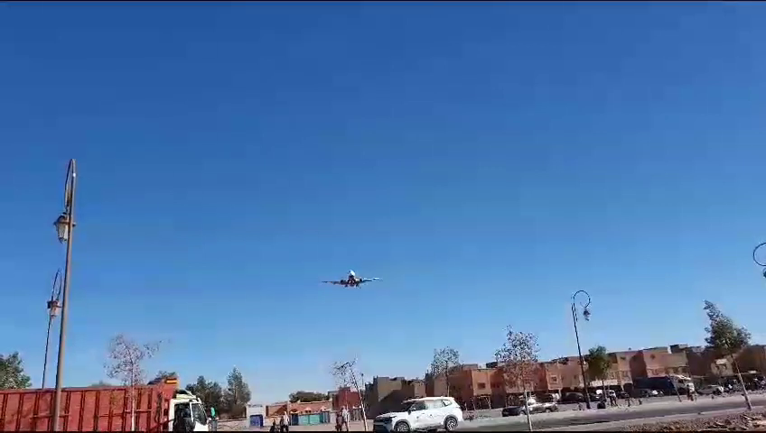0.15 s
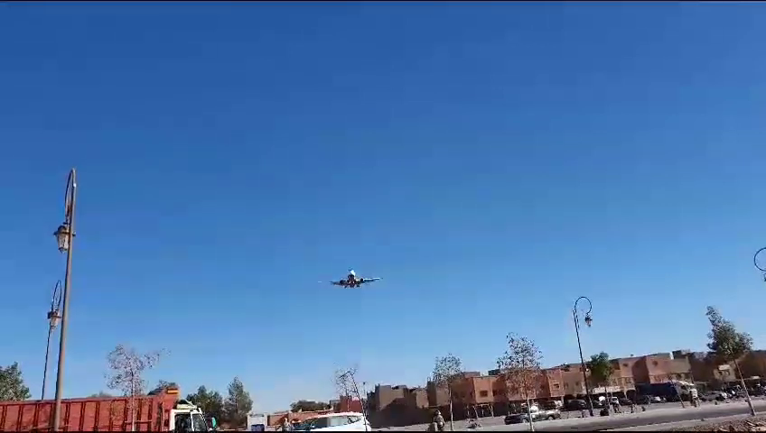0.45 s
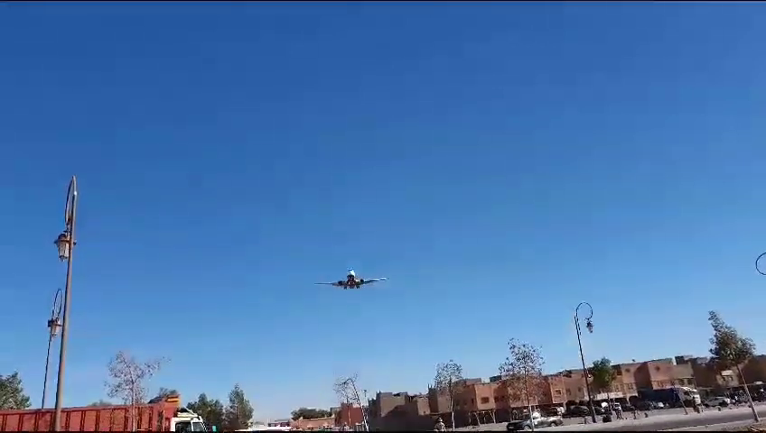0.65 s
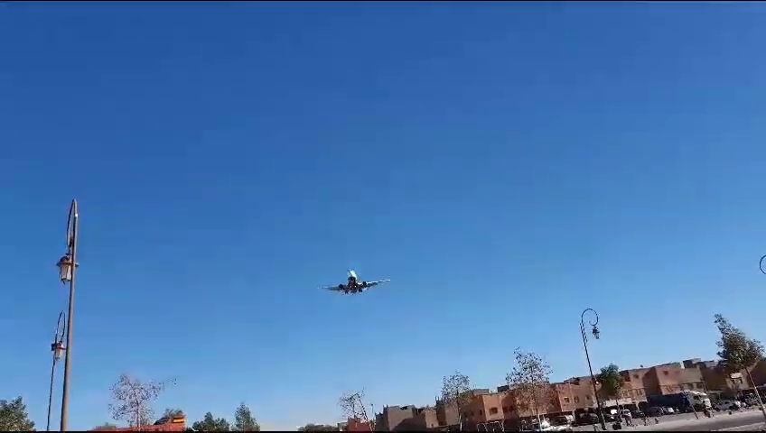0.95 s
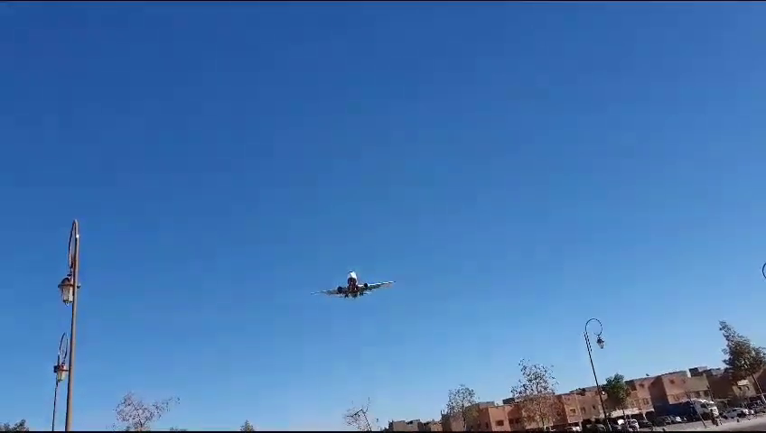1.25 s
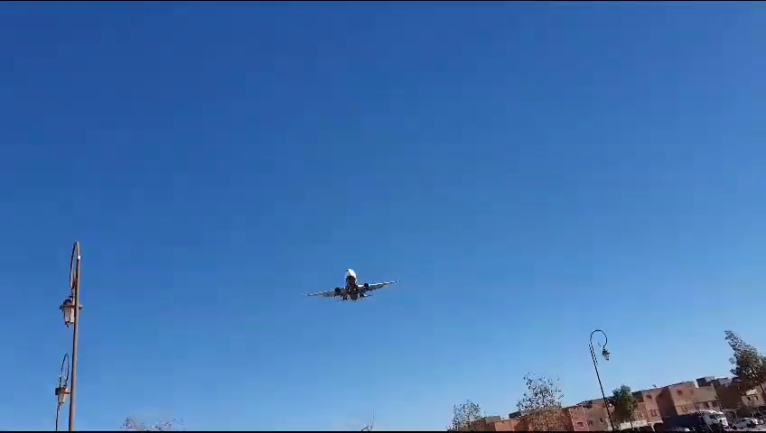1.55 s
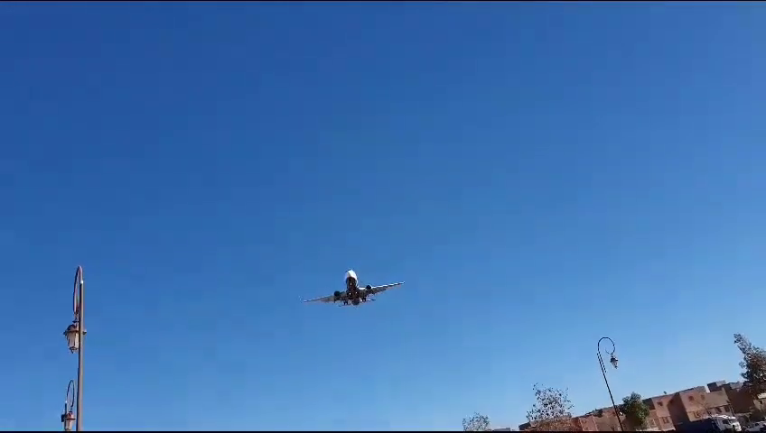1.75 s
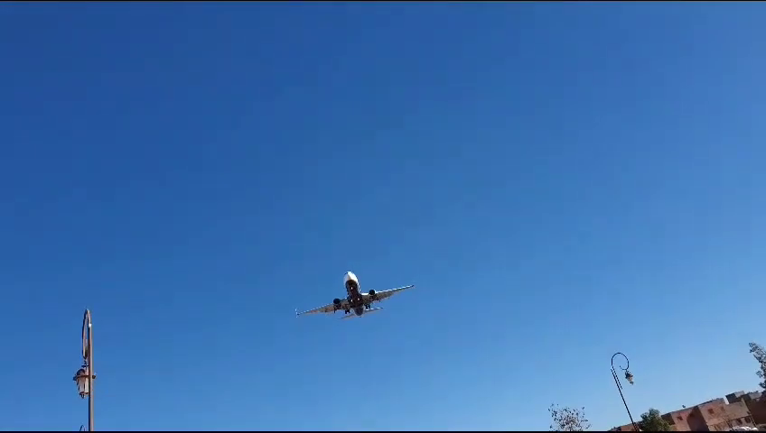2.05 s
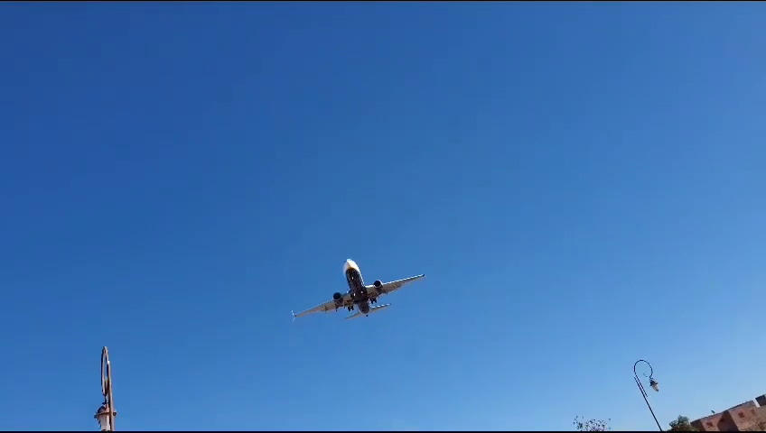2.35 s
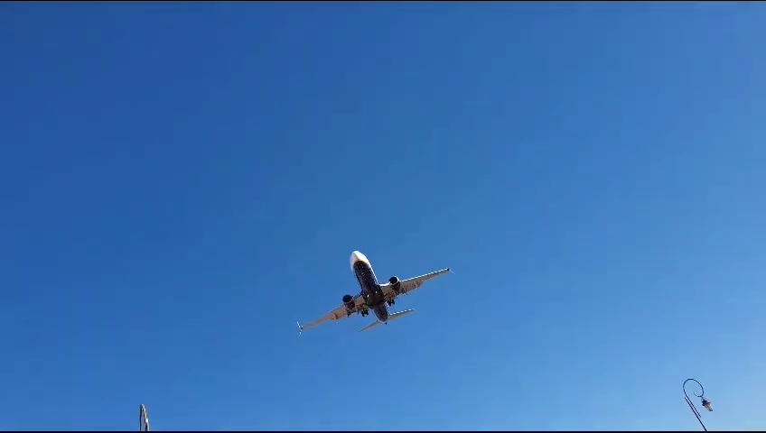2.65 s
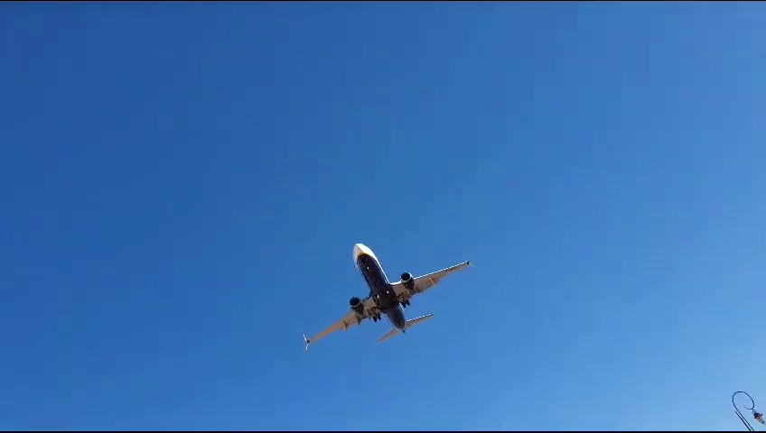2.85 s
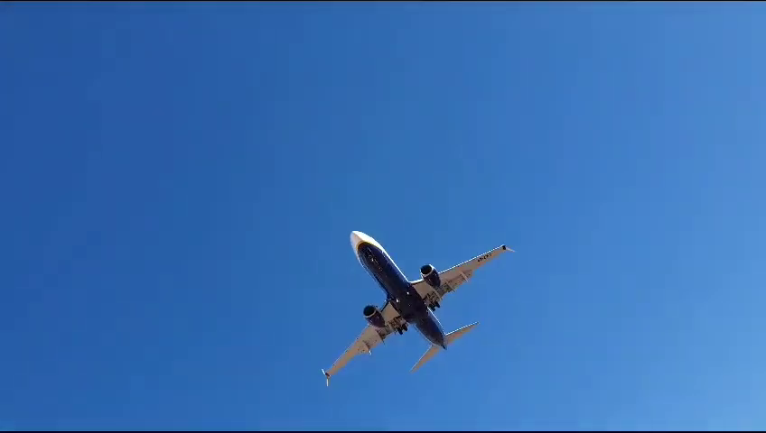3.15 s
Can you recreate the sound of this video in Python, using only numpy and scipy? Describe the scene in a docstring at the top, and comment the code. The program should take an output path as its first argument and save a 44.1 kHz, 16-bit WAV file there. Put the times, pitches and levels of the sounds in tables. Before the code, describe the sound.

After a brief silence, at about 0.1 s a jet airliner's low, muted roar opens over faint town hiss, with a thin whine near 1.5 kHz sinking slightly. From 1 to 2 s the roar swells and higher, flickering fan tones emerge. By 2.5-3.3 s it is loud, brighter and shrill, with sweeping ground-echo coloration. Irregular deep rumble surges strengthen late; a faint hum wavers; the left side is duller. It ends still loud.

```python
"""After a moment of silence the sound opens on a twin-engined airliner coming in low over a town.
Its roar, filtered noise, swells and brightens as the range shrinks; the ground echo sweeps a comb through it.
Two fans whine slightly out of tune, as flickering sine partials that turn stronger near the microphones.
Throughout lie an uneven rumble and a town hiss, both of noise, and a faint hum of two wavering sines."""
import sys
import numpy as np
from scipy import signal
from scipy.fft import rfft, irfft
from scipy.io import wavfile
from scipy.ndimage import uniform_filter1d, map_coordinates

SR = 44100
rng = np.random.default_rng(int(sys.argv[2]) if len(sys.argv) > 2 else 0)


def log_audio(samples):
    """Write samples as a 16-bit WAV file to the path given in sys.argv[1]."""
    # one column per channel
    frames = np.atleast_2d(samples).T
    # limit to full scale, then quantise
    limited = np.clip(frames, -1, 1)
    pcm = np.round(limited * 32767).astype(np.int16)
    wavfile.write(sys.argv[1], SR, pcm)


N = 145089

# tone of the jet and airframe noise, only its shape counts: pitch_hz [Hz], level_db [dB per Hz]
ROAR_TONE = [(25, -41), (60, -2), (120, 1), (220, -2.5), (400, -4), (600, -8.5), (1000, -9), (1500, -10.5),
             (2000, -17.5), (3200, -23.5), (5000, -24.5), (7200, -24.5), (9500, -26.5), (11700, -24),
             (14000, -31.5)]
# loss to the air and the engines' beaming, on top of spreading: pitch_hz [Hz], loss_db [dB per 100 m]
PATH_LOSS = [(100, 0), (180, -6.5), (260, -4), (500, 2.5), (1000, 3.5), (1400, 5), (2000, 15), (4000, 29.5),
             (7000, 31.5), (13000, 49.5)]
# push on the roar's low mids: start_s [s], level_db [dB]
LOW_MIDS_LEVEL = [(0, -4), (1.0, 1), (2.1, 1.5), (2.8, 1), (3.29, 3)]
LOW_MIDS_HZ = 213  # centre of the push
ROAR_DB = -20  # at the near range, before the echoes
SWELL_DB, SWELL_PER_S = 0.19, 6.47
SHIMMER_DB, SHIMMER_PER_S = .9, 40


def roar(t):
    """Jet and airframe turbulence; eddies on the path make each band shimmer."""
    hz, frame_s, frames = signal.stft(air_noise(ROAR_TONE), SR, nperseg=512)
    band_hz = np.geomspace(100, 14000, 14)
    eddies = np.array([np.interp(frame_s, t, walk(SHIMMER_PER_S)) for _ in band_hz])
    shimmer = np.array([np.interp(hz, band_hz, eddy) for eddy in eddies.T]).T
    octaves_away = np.log2(np.maximum(hz, 1) / LOW_MIDS_HZ)
    low_mids_db = np.outer(np.exp(-octaves_away ** 2), curve(LOW_MIDS_LEVEL, frame_s))
    approach_db = path_db(by_pitch(PATH_LOSS, hz)[:, None], frame_s)
    gain = undb(approach_db + low_mids_db + SHIMMER_DB * shimmer)
    x = signal.istft(frames * gain, SR)[1][:, :N]
    return x * undb(ROAR_DB + SWELL_DB * walk(SWELL_PER_S))


# blade-passing rate of the slower fan as heard, before its wander: start_s [s], pitch_hz [Hz]
FAN_PITCH = [(0, 1575), (.8, 1528), (1.05, 1486), (1.35, 1459), (1.7, 1454), (2.25, 1450), (2.7, 1442),
             (3.29, 1416)]
# speed of each fan against the slower one: ratio [no unit]
FAN_SPEEDS = [1, 1.017]
# partials of the whine, each with a lobe from the intake that sweeps over the listener:
# fan [0 or 1], multiple [of its blade rate], level_db [dB at the near range, before WHINE_DB],
# loss_db [dB per 100 m], lobe_range_m [m], lobe_db [dB]
WHINE_PARTIALS = [(0, 1, -43.5, 0, 129, 7), (0, 2.96, -51, 20, 123, 9), (0, 4, -47.5, 19, 70, 1),
                  (0, 5, -43.5, 24, 96, 2), (0, 6, -46.5, 46, 80, 0), (0, 7, -50, 40, 69, 4),
                  (0, 8, -46, 51, 68, 4), (1, 1, -48, 0, 130, 0), (1, 4, -52, 20, 80, 1),
                  (1, 5, -39.5, 39, 81, 5), (1, 6, -46.5, 38, 59, 5), (1, 7, -51, 45, 60, 2),
                  (1, 8, -48, 53, 60, 0)]
# forward beaming of the upper partials, which come in as the aircraft nears: range_m [m], level_db [dB]
INTAKE_BEAM = [(129, 0), (135, -3), (141, -8), (148, -18)]
LOBE_WIDTH_M = 8
WHINE_FLICKER_DB, WHINE_FLICKER_PER_S = 2.8, 26
WHINE_WANDER, WHINE_JITTER = .001, .0012  # slow and fast drift, as shares of the pitch
HAZE_DB, HAZE_PER_S = -15, 330  # level against the blade tone; higher multiples get more
WHINE_DB = -0.8  # trim of the whole whine


def whine(t):
    """Blade tones of two fans; each partial swells in its lobe, flickers and frays into a narrow haze."""
    out, range_m = np.zeros((2, N)), curve(RANGE_M, t)
    phases = []
    for ratio in FAN_SPEEDS:
        drift = 1 + WHINE_WANDER * walk(12) + WHINE_JITTER * walk(160)
        phases.append(2 * np.pi * np.cumsum(curve(FAN_PITCH, t) * ratio * drift) / SR)
    for fan, multiple, level_db, loss_db, lobe_m, lobe_db in WHINE_PARTIALS:
        beam_db = lobe_db * np.exp(-((range_m - lobe_m) / LOBE_WIDTH_M) ** 2)
        if multiple > 1:
            beam_db = beam_db + curve(INTAKE_BEAM, range_m)
        flicker_db = WHINE_FLICKER_DB * walk(WHINE_FLICKER_PER_S)
        gain = undb(level_db + beam_db + path_db(loss_db, t) + flicker_db)
        tone = gain * np.exp(1j * multiple * phases[fan])
        for side in range(2):
            # turbulence scatters a separate haze into each channel
            scatter = walk(HAZE_PER_S) + 1j * walk(HAZE_PER_S)
            haze = undb(HAZE_DB) * np.sqrt(multiple) * scatter
            out[side] += np.imag(tone * (1 + haze))
    return out * undb(WHINE_DB)


# approach of the aircraft: start_s [s], range_m [m]
RANGE_M = [(0, 150), (.5, 144.7), (1.0, 135.6), (1.5, 122.3), (2.0, 101.7), (2.5, 84.5), (2.8, 75.7),
           (3.0, 64.4), (3.29, 59.1)]
NEAR_M = 60  # range at which path_db is 0 dB


def path_db(loss_db, t):
    """Spreading and loss per 100 m on the way down, against the near range."""
    range_m = curve(RANGE_M, t)
    return -20 * np.log10(range_m / NEAR_M) - loss_db * (range_m - NEAR_M) / 100


ALTITUDE_M, EAR_M = 30.04, 1.554  # heights of aircraft and listener
GROUND_SHARE, GROUND_HZ = .52, 2180  # gain of the ground echo, and where it dulls
WALL_SHARE, WALL_S, WALL_HZ = .33, .0259, 700  # gain, lag and dulling of the house front


def over_ground(x, t):
    """The ground echo lags more as the aircraft climbs in the sky; a house front returns the lows."""
    lag_s = 2 * EAR_M * ALTITUDE_M / curve(RANGE_M, t) / 343  # speed of sound in m/s
    ground = GROUND_SHARE * echo(x, lag_s, GROUND_HZ)
    wall = WALL_SHARE * echo(x, WALL_S, WALL_HZ)
    return x + ground + wall


def echo(x, lag_s, hz):
    """A late copy, dulled above hz."""
    t = np.arange(N) / SR
    dull = irfft(rfft(x) / np.hypot(1, np.fft.rfftfreq(N, 1 / SR) / hz), N)
    return np.array([np.interp(t - lag_s, t, side) for side in dull])


# tone of the rumble, only its shape counts: pitch_hz [Hz], level_db [dB per Hz]
RUMBLE_TONE = [(18, -60), (28, -43), (43, -8.5), (56, -10.5), (69, 3.5), (82, -1), (95, -4.5), (116, -4),
               (135, -12.5), (180, -10.5), (260, -23), (800, -92.5)]
# bed under the surges: start_s [s], level_db [dB]
RUMBLE_BED = [(0, -22.5), (.8, -33.5), (1.8, -28.5), (3.29, -25.5)]
# surges of the rumble: peak_s [s], half_length_s [s], level_db [dB]
RUMBLE_SURGES = [(.16, 0.019, -29.5), (0.252, 0.018, -20.5), (0.518, 0.034, -20), (0.95, 0.058, -21.5),
                 (1.22, 0.049, -23), (1.454, 0.051, -19.5), (1.582, 0.015, -23.5), (1.772, .02, -20),
                 (1.852, 0.021, -20), (2.039, 0.082, -19.5), (2.265, 0.03, -18.5), (2.345, 0.017, -18.5),
                 (2.473, 0.065, -21.5), (2.64, 0.023, -18.5), (2.744, 0.035, -15.5), (2.809, 0.024, -15),
                 (2.985, 0.026, -16.5), (3.094, 0.037, -15.5)]


def rumble(t):
    """Deep noise, evened out and then shaped by bell-shaped surges of power over a drifting bed."""
    x = over_ground(air_noise(RUMBLE_TONE), t)
    running_level = np.sqrt(uniform_filter1d(x[0] ** 2, size=2400))
    power = undb(curve(RUMBLE_BED, t)) ** 2
    for peak_s, half_s, level_db in RUMBLE_SURGES:
        power = power + undb(level_db) ** 2 * np.exp(-((t - peak_s) / half_s) ** 2)
    return x / running_level * np.sqrt(power)


# partials of the hum, against its level: pitch_hz [Hz], level_db [dB]
HUM_PARTIALS = [(386, 1), (766, -14)]
# ride of the whole hum: start_s [s], level_db [dB]
HUM_RIDE = [(0, -50.5), (1.0, -38.5), (1.8, -36.5), (2.4, -30.5), (3.29, -36.5)]


def hum(t):
    """A faint drone and its near-octave, each wavering in level and phase."""
    tones = np.zeros(N)
    for pitch_hz, level_db in HUM_PARTIALS:
        gain = undb(level_db + 1.6 * walk(17))
        tones += gain * np.sin(2 * np.pi * pitch_hz * t + 0.54 * walk(16))
    return tones * undb(curve(HUM_RIDE, t))


# tone of the town hiss, only its shape counts: pitch_hz [Hz], level_db [dB per Hz]
TOWN_TONE = [(100, 8.5), (650, 2.5), (1000, 6), (2000, -5.5), (2600, -8), (3200, -19), (5000, -16),
             (6800, -18), (8500, -29), (12000, -24.5), (14000, -35)]
TOWN_DB = -46
TOWN_FLICKER_DB, TOWN_FLICKER_PER_S = .7, 18


def town():
    """Distant hiss of coloured noise that wavers a little."""
    gain = undb(TOWN_DB + TOWN_FLICKER_DB * walk(TOWN_FLICKER_PER_S))
    return gain * air_noise(TOWN_TONE)


# likeness of the two channels: pitch_hz [Hz], correlation [-1 to 1]
STEREO_LIKENESS = [(70, 1), (130, 0.96), (300, 0.91), (650, 0.73), (1300, 0.78), (2800, 0.16)]


def air_noise(rows):
    """Coloured stereo noise of rms 1, alike in the bass and nearly unrelated in the treble."""
    alike = np.clip(by_pitch(STEREO_LIKENESS, np.fft.rfftfreq(N, 1 / SR)), -1, 1)
    mid, side = rfft(rng.standard_normal((2, N))) * np.sqrt([1 + alike, 1 - alike])
    x = colour(irfft(np.array([mid + side, mid - side]), N), rows)
    return x / x.std()


def walk(rate):
    """Smooth random drift with a spread near 1, through rate random knots a second."""
    knots, at = rng.standard_normal(2048), np.linspace(0, N, 4096)
    drift = map_coordinates(knots, [at / SR * rate], order=2, mode="mirror")
    return np.interp(np.arange(N), at, drift)


def colour(x, rows):
    """Filter by a table of (Hz, dB)."""
    return irfft(rfft(x) * undb(by_pitch(rows, np.fft.rfftfreq(N, 1 / SR))), N)


def by_pitch(rows, hz):
    """Straight lines through (Hz, value) rows on a log axis."""
    f, v = np.array(rows, float).T
    return np.interp(np.log(np.maximum(hz, 1)), np.log(f), v)


def curve(rows, t):
    """Straight lines through rows of (position, value)."""
    return np.interp(t, *np.array(rows, float).T)


def undb(db):
    """Decibels to gain."""
    return 10 ** (np.asarray(db) / 20)


def scene():
    """The aircraft over the ground, with a rumble, a hum and the town."""
    t = np.arange(N) / SR
    aircraft = over_ground(roar(t) + whine(t), t)
    return aircraft + rumble(t) + hum(t) + town()


# muffling of the left microphone against the right: pitch_hz [Hz], level_db [dB]
LEFT_TONE = [(150, 0.5), (370, -2.7), (670, -2), (1220, -9.5), (2230, -7.5), (4000, -13.5), (7400, -28.5),
             (10000, -26), (13000, -14.5)]
# phase shift of that muffling, negative is late: pitch_hz [Hz], phase_rad [radians]
LEFT_SHIFT = [(20, 1), (70, -0.25), (130, -0.22), (300, -.66), (650, -0.97), (1300, -1.2), (2800, -1.1)]
START_S, OPEN_S = 0.086, 0.01  # silence, then length of the fade-in
TOP_HZ = 14250


def record(dry):
    """The left microphone is dull and mostly late; the sound opens after a moment and the top is cut."""
    phase = by_pitch(LEFT_SHIFT, np.fft.rfftfreq(N, 1 / SR))
    shifted = irfft(rfft(dry[0]) * np.exp(1j * phase), N)
    x = np.array([colour(shifted, LEFT_TONE), dry[1]])
    x = x * np.clip((np.arange(N) / SR - START_S) / OPEN_S, 0, 1)
    return signal.sosfilt(signal.ellip(12, .2, 90, TOP_HZ, fs=SR, output="sos"), x)


dry = scene()
out = record(dry)
log_audio(out)
```